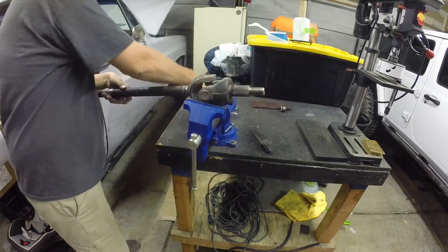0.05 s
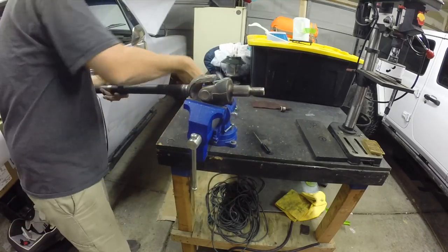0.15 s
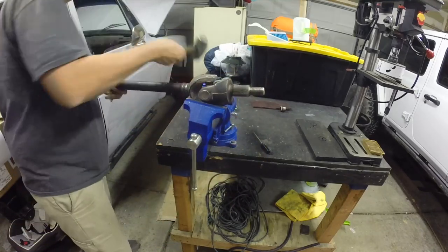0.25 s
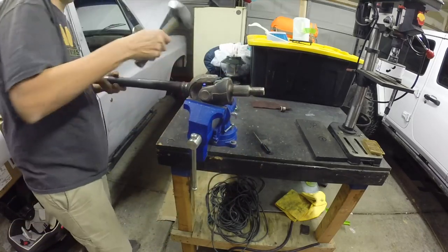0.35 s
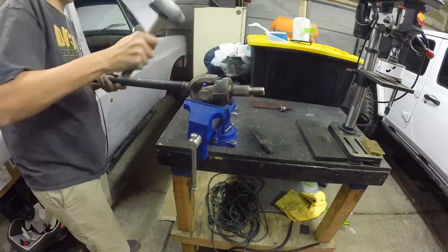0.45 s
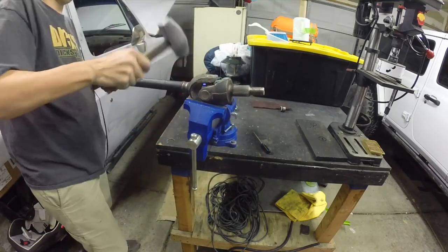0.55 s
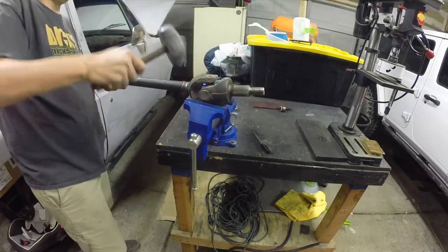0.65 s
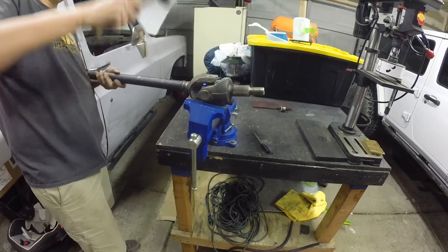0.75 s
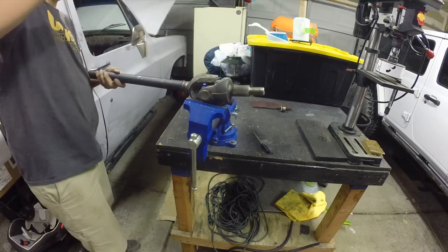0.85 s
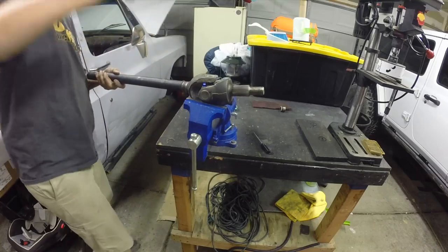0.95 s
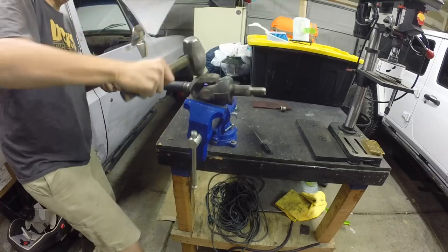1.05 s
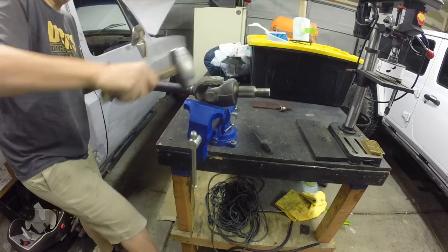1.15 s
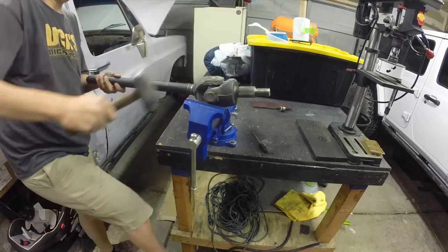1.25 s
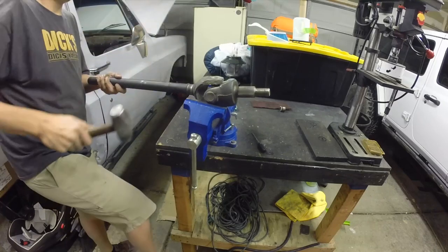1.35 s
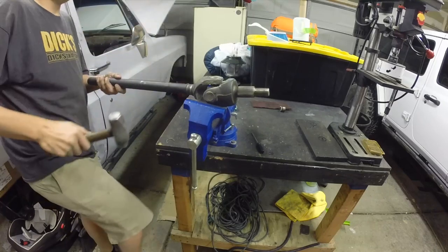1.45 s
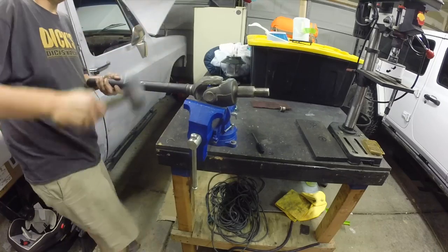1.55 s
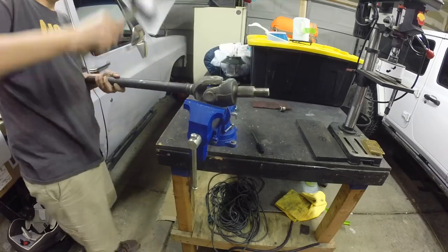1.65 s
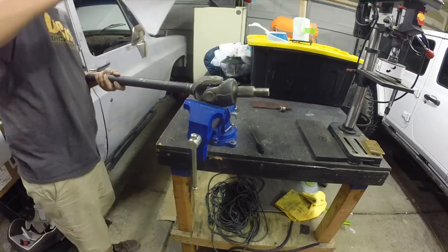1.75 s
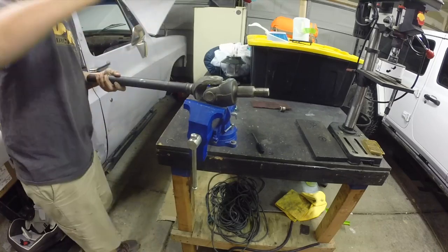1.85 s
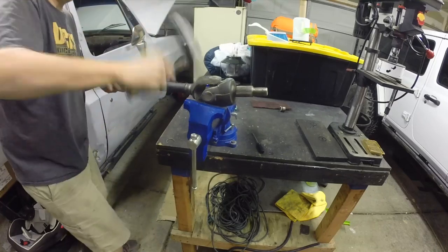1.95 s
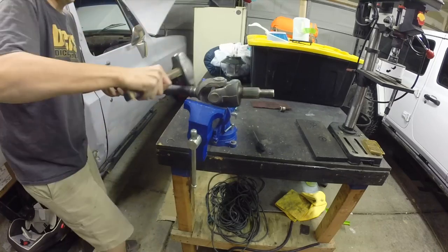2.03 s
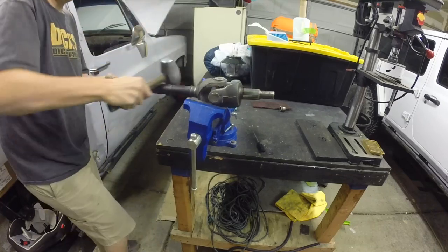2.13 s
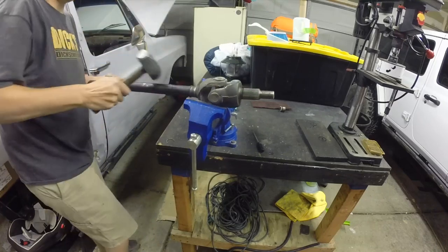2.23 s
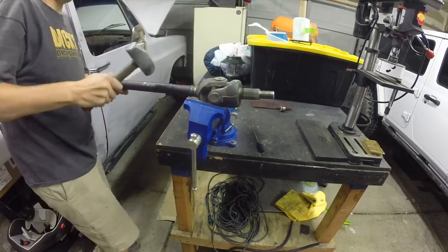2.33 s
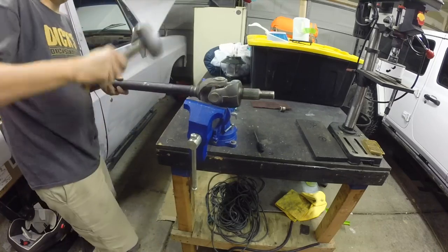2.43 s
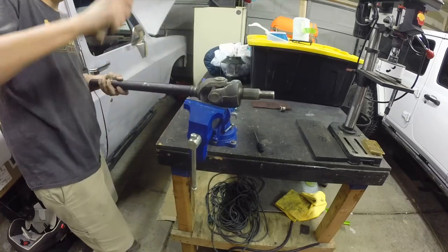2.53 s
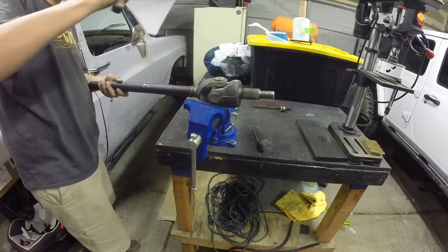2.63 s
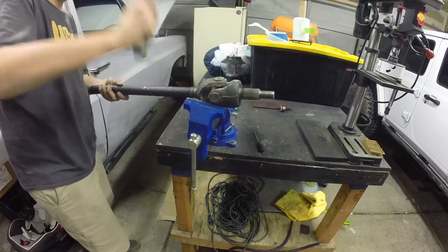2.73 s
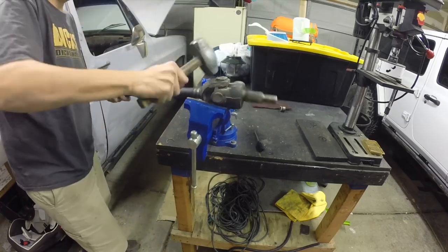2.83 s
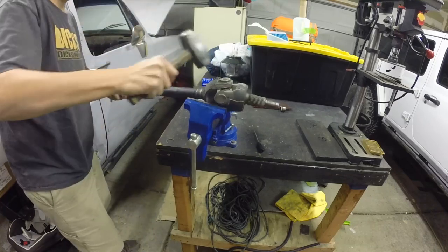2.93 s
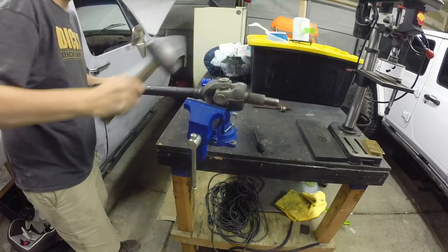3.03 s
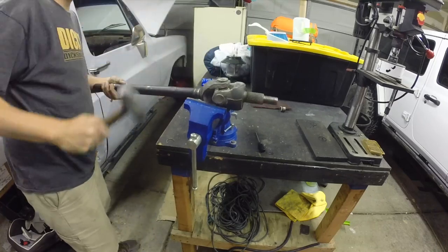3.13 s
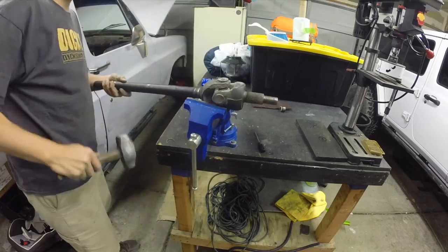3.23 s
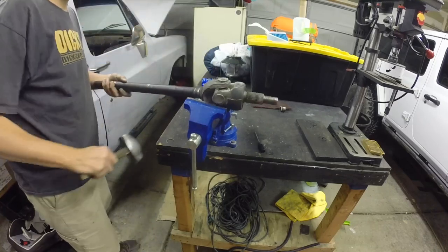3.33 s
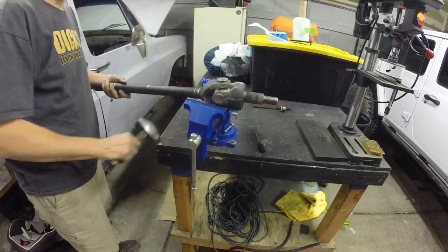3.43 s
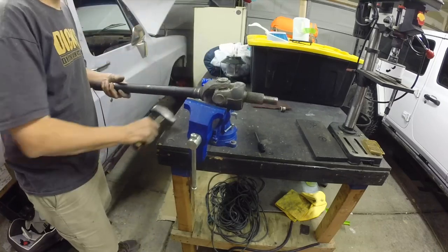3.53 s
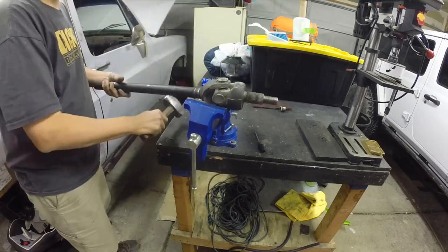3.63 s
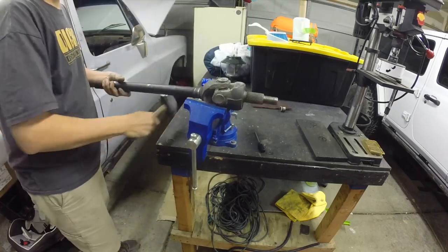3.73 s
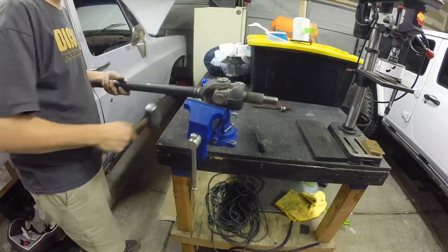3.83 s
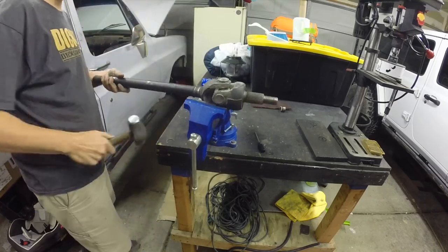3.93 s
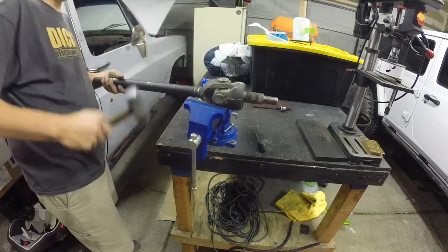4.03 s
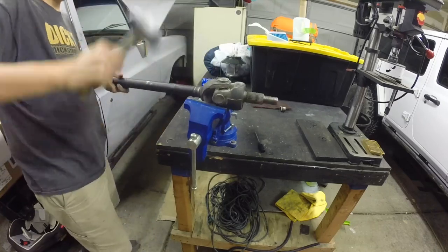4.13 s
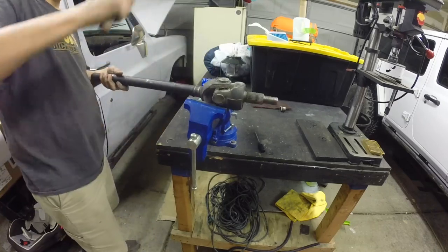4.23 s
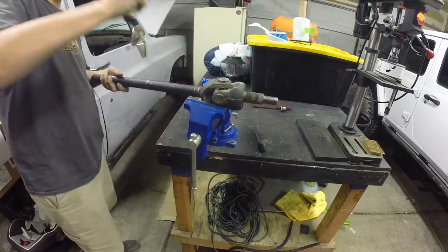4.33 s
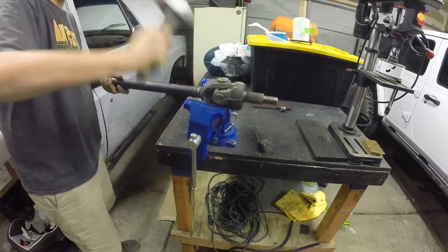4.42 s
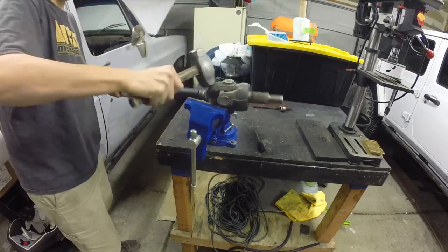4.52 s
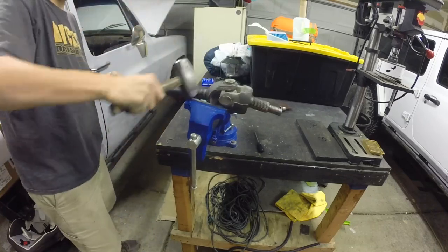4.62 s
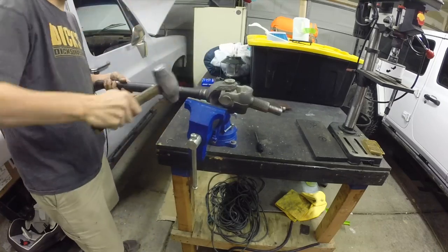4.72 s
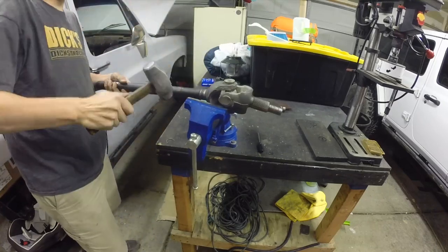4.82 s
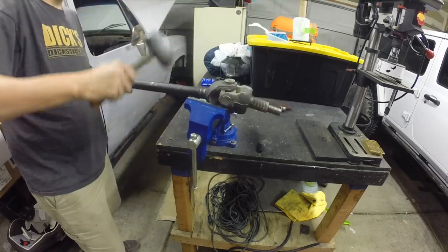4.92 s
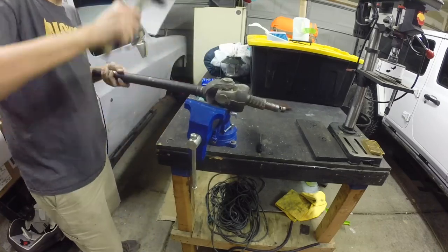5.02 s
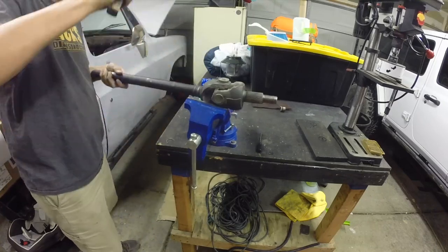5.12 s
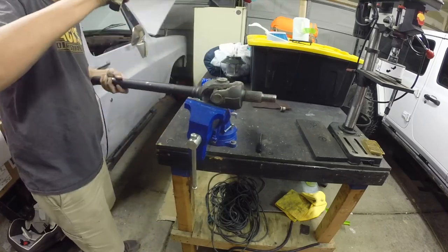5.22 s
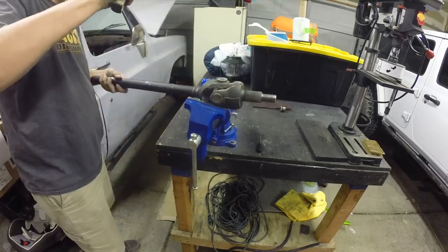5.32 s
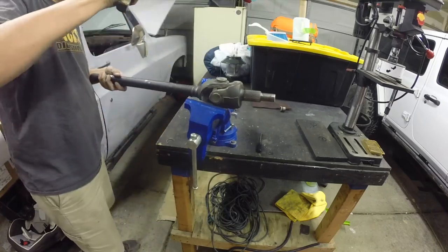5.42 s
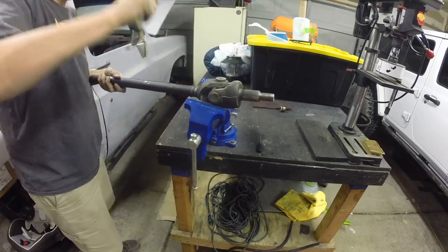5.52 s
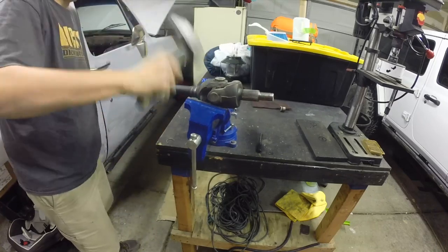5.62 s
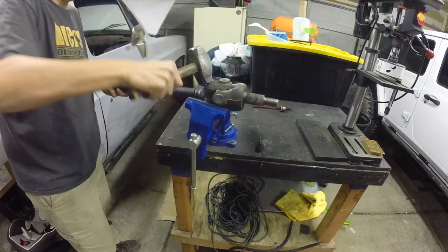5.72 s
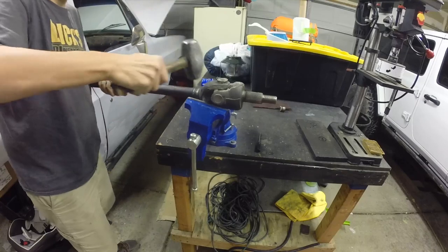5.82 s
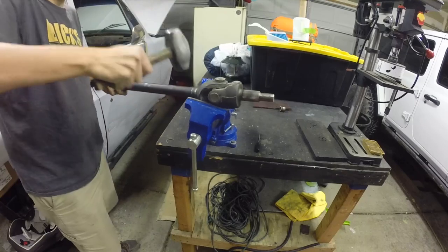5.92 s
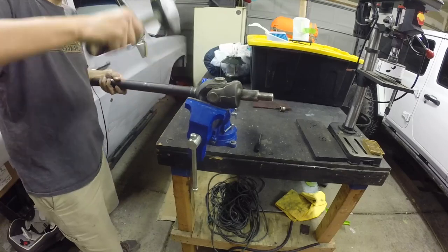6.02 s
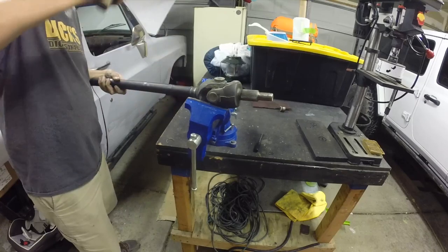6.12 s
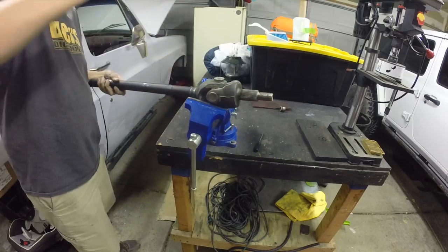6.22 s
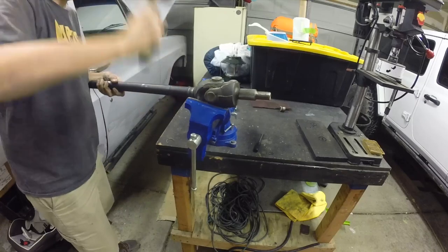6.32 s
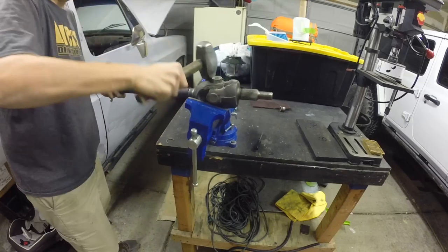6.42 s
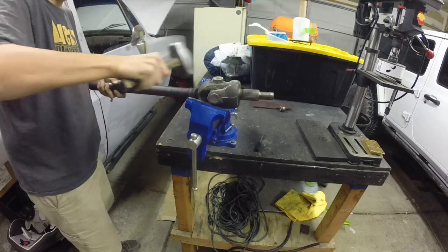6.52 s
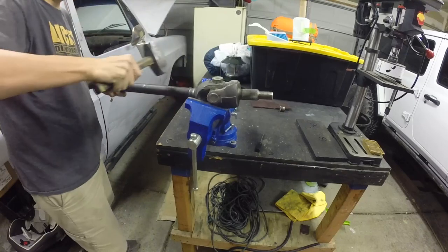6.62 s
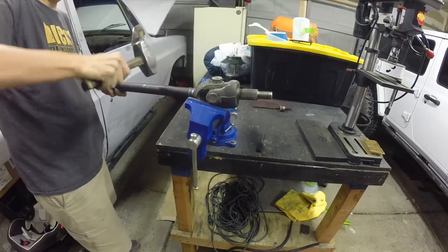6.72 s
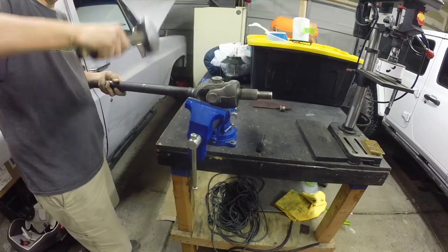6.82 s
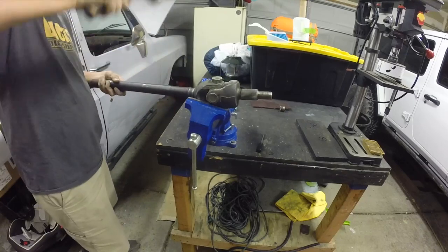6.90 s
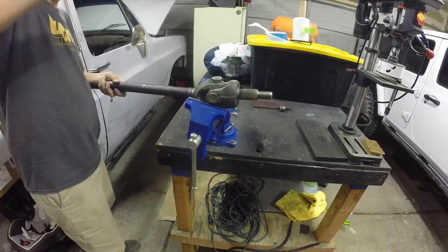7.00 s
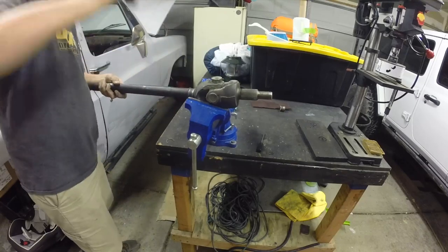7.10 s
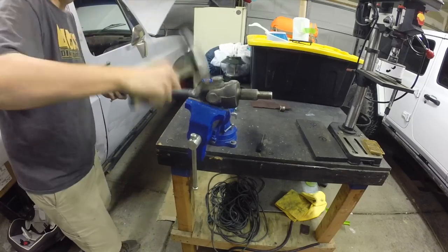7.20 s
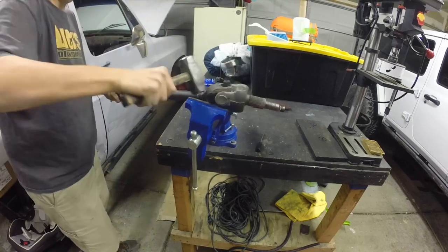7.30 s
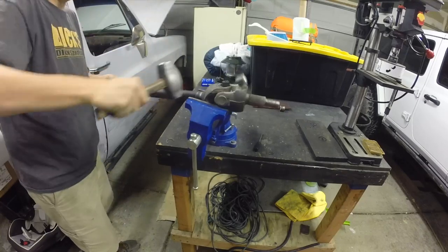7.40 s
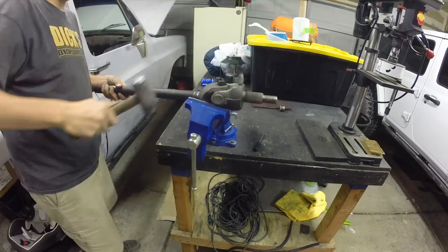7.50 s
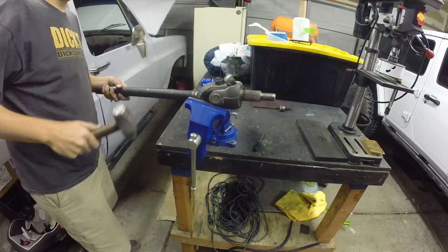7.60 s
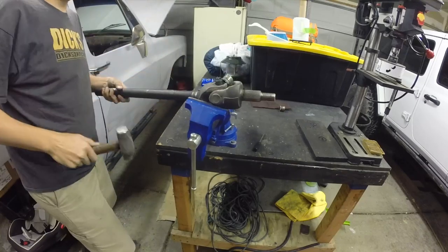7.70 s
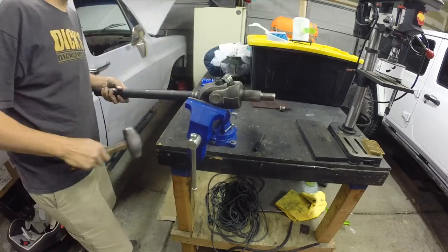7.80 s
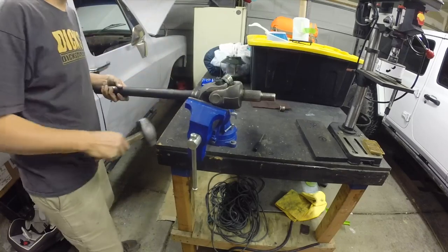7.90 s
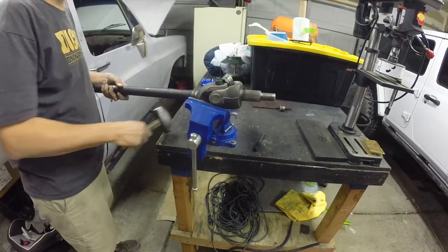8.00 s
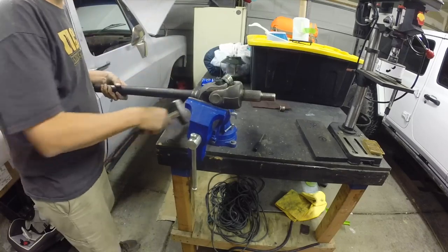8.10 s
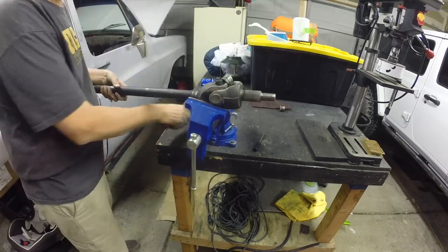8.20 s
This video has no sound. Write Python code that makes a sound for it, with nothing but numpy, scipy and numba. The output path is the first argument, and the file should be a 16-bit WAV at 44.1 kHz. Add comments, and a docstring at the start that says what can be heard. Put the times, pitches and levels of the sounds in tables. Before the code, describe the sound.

A small sledgehammer strikes a steel shaft clamped in a bench vise seven times, roughly a second apart. Each blow is a sharp crack with a brief, bright metallic ring and a thud from the wooden bench, followed by clinks of the loose vise handle. After the last blow a small steel tool hops on the bench top. The sound is close, with a short garage echo and faint hiss.

```python
"""In a garage, a small sledgehammer strikes a steel shaft held in a bench vise seven times.
Each blow cracks, makes the shaft and the hammer head ring, and shakes the wooden bench.
The loose vise handle clinks after it, a small steel tool hops, and feet and clothes shift in between.
The room echoes over a faint hiss. Gentle gain control and a look-ahead limiter squeeze the blows."""
import sys
import numpy as np
from scipy import signal
from scipy.fft import rfft, irfft, next_fast_len
from scipy.io import wavfile
from numba import njit

SR = 44100
rng = np.random.default_rng(int(sys.argv[2]) if len(sys.argv) > 2 else 0)


def persist_wave(psi):
    """Save psi, clipped to +-1, as 16-bit WAV."""
    counts = np.round(np.clip(psi, -1, 1) * 32767).astype(np.int16)
    wavfile.write(sys.argv[1], SR, np.atleast_2d(counts).T)


N = 363899


def hammer_blows():
    """Steel hits steel: shaft and head ring, the hit cracks and rebounds, the bench is shaken."""
    # t/s, then level/dB of: crack, shake, thud, shaft near 1, 2.4, 3.8, 4 and over 5 kHz,
    # short head ring, long head ring
    blows = [(1.12, 1.5, 1.5, 4.5, -6.5, -8, 2, -7.5, -7, -7.5, -7),
             (2.047, -1, 0, 4.5, -5, -4.5, 0.5, -12, -9.5, -7.5, -7.5),
             (2.896, 1.5, -4, 0.5, -16, -6, -4, -6, -5, -6.5, -5.5),
             (4.548, -1, -2, 3.5, -10.5, -11, -4.5, -9.5, -7, -7, -7.5),
             (5.727, -4.5, -7, -0.5, -14.5, -16, -12, -11.5, -11.5, -15.5, -15),
             (6.461, 0.5, -2, 6, -14, -9.5, -6, -5.5, -9.5, -15, -24),
             (7.297, -1, -4, 0.5, -9.5, -21, -9, -10, -6, -15, -16)]
    shaft_hz = [807, 1062, 1249, 1314, 1438, 2369, 2394, 3797, 3880, 3933, 4075, 4410, 4800, 5530, 5584,
                6440, 8103, 8425, 10650, 13140]  # tones of shaft and vise: f/Hz
    shaft_modes = [(-17.5, 0.6), (-12, 0.5), (-13.5, 0.49), (-12, 0.26), (-17.5, 0.3), (-6, 0.46),
                   (-9, 0.49), (-13, 0.47), (-16.5, 0.27), (0.5, 0.44), (-14, 0.12), (-19.5, 0.3),
                   (-29, 0.75), (-12, 0.32), (-11, 0.46), (-19.5, 0.35), (-12.5, 0.25), (-15.5, 0.4),
                   (-20, 0.34), (-33.5, 0.25)]  # for each tone: level/dB, base fade time/s
    group_edges = [1600, 3000, 3900, 5000]  # borders between the five shaft levels: f/Hz
    head_hz = [14490, 14530]  # tones of the hammer head: f/Hz
    head_modes = [(-47, 1.6), (-26.5, .5)]  # for each tone: level/dB, base fade time/s
    crack_colour = [(59, -49.5), (100, -13), (1910, -2), (2470, -3.5), (3120, -1.5), (3860, 2),
                    (7450, -9.5), (8460, -10.5), (9820, -21), (16000, -33.5)]  # tone colour of the hit: f/Hz, level/dB
    shake_colour = [(76, -34.5), (130, -5.5), (2360, -9), (3610, -13.5), (3990, -5), (4320, -14.5),
                    (10300, -26.5), (15100, -44), (16000, -84.5)]  # tone colour of the rattling bench: f/Hz, level/dB
    crack, shake, thud, steel = np.zeros((4, N))
    group = np.searchsorted(group_edges, shaft_hz)
    for s, crack_db, shake_db, thud_db, *shaft_db, short_db, long_db in blows:
        add(crack, s, undb(crack_db) * burst(0.018))
        add(crack, s + 0.007, undb(crack_db - 4) * burst(0.01))  # the rebound
        add(shake, s, undb(shake_db) * burst(0.4, rise_s=0.0025))
        add(thud, s, undb(thud_db) * burst(0.3, rise_s=0.0054))
        add(steel, s, ring(shaft_hz, shaft_modes, np.array(shaft_db)[group], flutter_db=5, waver_rad=1.2))
        add(steel, s, ring(head_hz, head_modes, [long_db, short_db], flutter_db=3, waver_rad=0.3))
    shake *= flicker(N, hold=200)  # things on the bench jump and land unevenly
    clatter = undb(15.5) * shape(crack, crack_colour) + undb(5.5) * shape(shake, shake_colour)
    return steel, clatter, thud


def vise_handle():
    """The loose handle knocks in its hole with a ring and a tick."""
    # t/s, then level/dB of: tones below 9 kHz, short tones near 10 kHz, long tone near 10 kHz
    clinks = [(1.174, -20.5, -15.5, -33.5), (1.259, -15.5, -27, -36), (2.099, -25.5, -24.5, -27.5),
              (2.1736, -17, -22.5, -12), (2.945, -27.5, -19, -30.5), (3.0111, -15, -14.5, -16.5),
              (4.5714, -15.5, -17, -34), (4.6676, -18, -20, -36), (5.809, -21, -19, -23),
              (6.4985, -25.5, -18, -36), (6.6049, -24.5, -30, -41), (7.34, -16.5, -19.5, -23.5)]
    handle_hz = [3149, 6148, 6178, 8930, 9950, 9964, 10010]  # tones of the handle: f/Hz
    handle_modes = [(-9.5, 0.36), (-8.5, 0.3), (-8, 0.37), (-19.5, 0.2), (-9.5, 0.4), (-30.5, 1.4),
                    (-11.5, 0.29)]  # for each tone: level/dB, base fade time/s
    out = np.zeros(N)
    for s, low_db, short_db, long_db in clinks:
        levels_db = [low_db] * 4 + [short_db, long_db, short_db]
        add(out, s, ring(handle_hz, handle_modes, levels_db, flutter_db=3, waver_rad=0.66))
        add(out, s, undb(low_db - 11.5) * band(burst(0.008), 7000, 12000))
    return out


def hopping_tool():
    """A small steel tool hops on the bench top: a thin ring and a bright tick."""
    hops = [(3.491, -50, -71, -80.5), (7.5002, -5, -48, -48), (7.6031, -8.5, -56.5, -28),
            (7.6098, -15, -64.5, -62), (7.6926, -17.5, -46, -49), (7.7079, -10.5, -37, -41)]  # t/s, tick/dB, ring below 10 kHz/dB, ring above 10 kHz/dB
    tool_hz = [2406, 2568, 3881, 4102, 4770, 5577, 5889, 6595, 7784, 9442, 11010, 11800, 13500]  # tones of the tool: f/Hz
    tool_modes = [(-8.5, 0.52), (-4, 0.49), (-3.5, 0.37), (-2.5, 0.31), (-2.5, 0.33), (0.5, 0.31),
                  (-7.5, 0.26), (-1.5, 0.22), (-9, 0.21), (-20, .2), (-6.5, 0.23), (-12.5, 0.28),
                  (-22, .12)]  # for each tone: level/dB, base fade time/s
    tick_colour = [(500, -18.5), (3000, 3.5), (6000, -8), (12000, -19.5), (16000, -29)]  # f/Hz, level/dB
    tick, chime = np.zeros((2, N))
    for s, tick_db, low_db, high_db in hops:
        levels_db = np.where(np.array(tool_hz) > 10000, high_db, low_db)
        add(chime, s, ring(tool_hz, tool_modes, levels_db, flutter_db=5.5, waver_rad=0.6))
        add(tick, s, undb(tick_db) * burst(0.013))
    return chime, shape(tick, tick_colour)


def bench(pushes):
    """The wooden bench booms: four pushes drive its lowest, deep, middle and upper tones."""
    wood_modes = [(55.5, 35, 3), (135.5, 34, -2.5), (158, 36, -1), (348, 110, -2.5), (496, 87, -1.5),
                  (850, 540, 6.5), (812, 45, -3.5), (1650, 550, 0), (2254, 1600, -11)]  # tones of the wood: f/Hz, width/Hz, level/dB
    edges_hz = [90, 240, 700]
    return sum(undb(db) * band(pushes[np.searchsorted(edges_hz, hz)], hz, width)
               for hz, width, db in wood_modes)


def bench_pushes(thud):
    """Dull bumps of feet, hands and bench join the hammer's thud to make the four pushes."""
    bumps = [(0.006, -17, -36, -40, 0.24), (0.044, -5, -19.5, -34, 0.68), (0.1, 5.5, 0.5, -15, 0.19),
             (0.141, -7.5, -9.5, -34, 0.17), (3.524, -12, -8.5, -27.5, 0.13), (3.559, -12, -12, -36, 0.14),
             (3.85, -25.5, -34, -52, 0.13), (5.008, -26.5, -20, -43, 0.12),
             (5.191, -13, -17.5, -31.5, 0.23), (5.251, -13.5, -15, -39, 0.18),
             (5.505, -12.5, -17.5, -40.5, 0.28), (5.539, -11.5, -20, -37, 0.13),
             (5.579, -13.5, -28.5, -40.5, 0.072), (6.398, -12.5, -28, -46, 0.21),
             (7.619, -11.5, -6.5, -21, 0.1), (7.977, -25, -17, -33, 0.14), (8.036, -14.5, -13.5, -27, 0.23)]  # t/s, thud/dB, knock/dB, hard edge/dB, fade time/s
    pushes = np.array([thud, thud, undb(-11) * thud, np.zeros(N)])
    shove = undb(-9.5) * np.hanning(int(0.0021 * SR))
    for s, thud_db, knock_db, edge_db, fade_s in bumps:
        add(pushes[1], s, undb(thud_db) * shove)  # one soft shove, then some noisy drag
        drag = burst(fade_s, rise_s=0.00088)
        for push, db in zip(pushes, [thud_db - 13.5, thud_db - 2.5, knock_db, edge_db]):
            add(push, s, undb(db) * drag)
    return pushes


def tiny_ticks():
    """Faint, bright ticks, each a very short burst of noise."""
    ticks = [(0.8684, -47, 8480), (4.3724, -46, 11430), (4.3814, -40, 8774), (5.101, -49.5, 9800),
             (5.1996, -46, 7530), (8.2045, -33, 3030), (8.2397, -42, 4850)]  # t/s, level/dB, f/Hz
    out = np.zeros(N)
    for s, db, hz in ticks:
        add(out, s, undb(db) * band(burst(0.0092), hz, hz / 1.11))
    return out


def rustle():
    """Clothes swish and shoes scuff: grainy noise that swells and fades."""
    swishes = [(0.113, -43, 1800, 2470, 0.037), (0.427, -68, 7000, 6000, 0.049),
               (0.544, -59, 4500, 7000, 0.034), (0.606, -55, 1800, 3920, 0.044),
               (0.896, -67, 5420, 5000, 0.037), (1.533, -48.5, 1950, 900, 0.04),
               (1.598, -51, 904, 693, .09), (5.039, -52, 876, 908, 0.05), (5.141, -49, 550, 694, 0.059),
               (6.443, -44, 404, 303, 0.048)]  # middle t/s, level/dB, f/Hz, width/Hz, swell time/s
    out = np.zeros(N)
    for s, db, hz, width, swell_s in swishes:
        t = np.arange(-2 * swell_s, 2 * swell_s, 1 / SR)
        grains = flicker(SR // 2, hold=100) * rng.standard_normal(SR // 2)
        swish = unit(band(grains, hz, width))[:len(t)]
        swell = np.exp(-(t / swell_s) ** 2)
        add(out, s - 2 * swell_s, undb(db) * swell * swish)
    return out


def garage_echo(x):
    """The room smears sound into a tail of noise in which each octave fades at its own pace."""
    echo_fades = [(50, 0.9), (200, 0.51), (1000, 0.59), (4000, 0.37), (15000, 0.16)]  # f/Hz, fade time/s
    hz, fades_s = np.transpose(echo_fades)
    t = np.arange(SR) / SR
    spectrum = rfft(rng.standard_normal(SR))
    octaves = np.log2(np.arange(SR // 2 + 1) + 1)
    tail = np.zeros(SR)
    for octave in range(4, 16):
        share = np.clip(1 - np.abs(octaves - octave), 0, 1)
        fade_s = np.interp(octave, np.log2(hz), fades_s)
        tail += irfft(spectrum * share, SR) * undb(-60 * t / fade_s)
    tail *= 1 - np.exp(-t / 0.0083)  # the echo takes a moment to build
    return signal.fftconvolve(x, tail / np.sqrt(np.sum(tail ** 2)))[:N]


def air():
    """Steady garage air and microphone hiss."""
    air_colour = [(13, -35), (22, 2.5), (64, 3.5), (356, -11), (524, -13.5), (935, -17), (1070, -17.5),
                  (12100, -41), (16000, -52)]  # f/Hz, level/dB
    return undb(-55.5) * unit(shape(rng.standard_normal(N), air_colour))


def ring(tones_hz, modes, strike_db, flutter_db, waver_rad, fade_scale=0.87):
    """Struck steel rings in fading tones; loose contacts make each flutter in level and waver in pitch."""
    own_db, base_fades_s = np.transpose(modes)
    fades_s = base_fades_s * fade_scale
    t = np.arange(int(fades_s.max() * SR)) / SR
    wobbles = rng.standard_normal((len(tones_hz), 300))
    wobble_times = np.arange(300) * 0.022
    out = np.zeros(len(t))
    for hz, db, fade_s, wobble in zip(tones_hz, own_db + strike_db, fades_s, wobbles):
        age = t[:int(0.9 * fade_s * SR)]
        flutter = flutter_db * np.interp(age, wobble_times, wobble)
        waver = waver_rad * np.interp(age, wobble_times, wobble[::-1])
        tone = np.sin(2 * np.pi * (hz * age + wobble[-1]) + waver)
        out[:len(age)] += undb(db - 60 * age / fade_s + flutter) * tone
    return out * np.minimum(t / 0.002, 1)


def burst(fade_s, rise_s=0.00061):
    """Noise that swells quickly and dies away; a fade time is the time to drop 60 dB."""
    t = np.arange(int(fade_s * SR)) / SR
    return rng.standard_normal(len(t)) * (1 - np.exp(-t / rise_s)) * undb(-60 * t / fade_s)


def flicker(length, hold, spread_db=3):
    """A gain that jumps to a new random value every hold samples."""
    steps = rng.standard_normal(length // hold + 1)
    return undb(spread_db * np.repeat(steps, hold)[:length])


def band(x, hz, width):
    """Keep the sound near hz by filtering it twice."""
    b, a = signal.iirpeak(hz, hz / width, fs=SR)
    return signal.lfilter(b, a, signal.lfilter(b, a, x))


def shape(x, colour):
    """Give x a tone colour from (f/Hz, level/dB) points."""
    size = next_fast_len(len(x) + 4096)
    grid_hz = np.maximum(np.arange(2049) * SR / 4096, 1)
    hz, db = np.transpose(colour)
    cepstrum = irfft(np.interp(np.log(grid_hz), np.log(hz), db) * np.log(10) / 20)
    cepstrum[1:2048] *= 2  # folded so that the filter never sounds before the hit
    cepstrum[2049:] = 0
    response = irfft(np.exp(rfft(cepstrum)))
    return irfft(rfft(x, size) * rfft(response, size), size)[:len(x)]


def undb(db):
    """Turn decibels into a gain."""
    return 10 ** (np.asarray(db) / 20)


def unit(x):
    """Scale x to an average power of 1."""
    return x / np.sqrt(np.mean(x ** 2))


def add(out, s, x):
    """Mix x into out, starting at s seconds."""
    i = int(s * SR)
    out[i:i + len(x)] += x[:N - i]


@njit
def follow(x, attack, release):
    """Track a level, climbing fast and sinking slowly."""
    levels, level = np.empty(len(x)), 0.
    for i in range(len(x)):
        level += (x[i] - level) * (attack if x[i] > level else release)
        levels[i] = level
    return levels


def squeeze(x, top_db, ratio, attack_s, ahead, release_s=0.18):
    """Turn down what is louder than top_db, acting ahead samples early."""
    level = follow(np.abs(x), 1 / (attack_s * SR), 1 / (release_s * SR))
    gain = np.minimum(1, undb(top_db) / (level + 1e-9)) ** (1 - 1 / ratio)
    return x * np.append(gain[ahead:], np.full(ahead, gain[-1]))


def scene():
    """Mix ringing steel, booming wood and crisp noises with the echo and the air."""
    steel, clatter, thud = hammer_blows()
    chime, tool_tick = hopping_tool()
    rings = steel + vise_handle() + chime
    wood = bench(bench_pushes(thud))
    crisp = clatter + tool_tick + tiny_ticks() + rustle()
    echo = garage_echo(undb(-7.5) * crisp + undb(-11) * (rings + wood))
    return (rings + wood + crisp + echo + air())[None]


def record(dry):
    """The microphone drops deep bass; loud peaks are squeezed and clipped, and the top treble is cut."""
    x = signal.lfilter(*signal.butter(2, 42, "high", fs=SR), dry[0])
    x = squeeze(x, top_db=-42, ratio=1.261, attack_s=0.0023, ahead=600)  # gentle gain control
    x = squeeze(x, top_db=-15.5, ratio=2.4, attack_s=0.004, ahead=60)  # limiter
    x = np.clip(undb(2.5) * x, -0.95, 0.95)
    treble_cut = signal.ellip(8, 0.2, 70, 15700, fs=SR, output="sos")
    return np.clip(signal.sosfilt(treble_cut, x), -1, 1)[None]


dry = scene()
out = record(dry)
persist_wave(out)
```